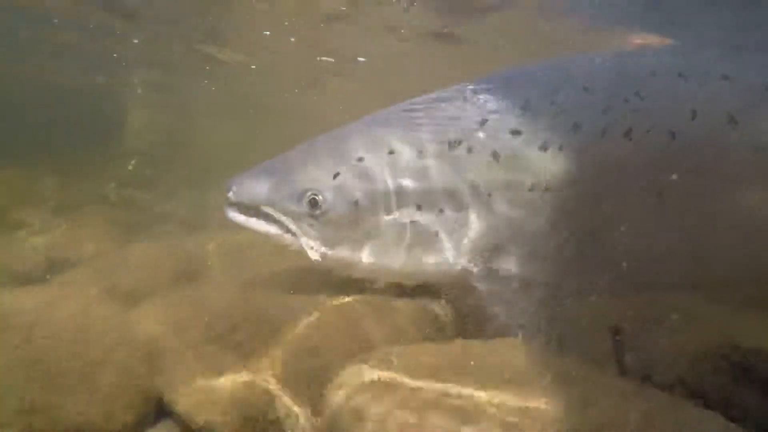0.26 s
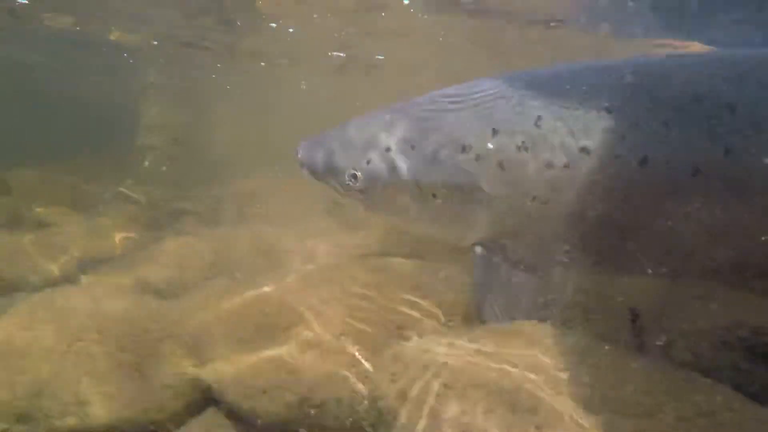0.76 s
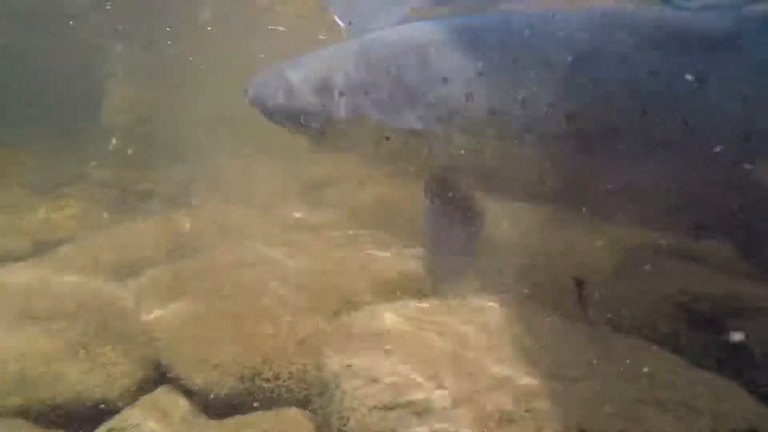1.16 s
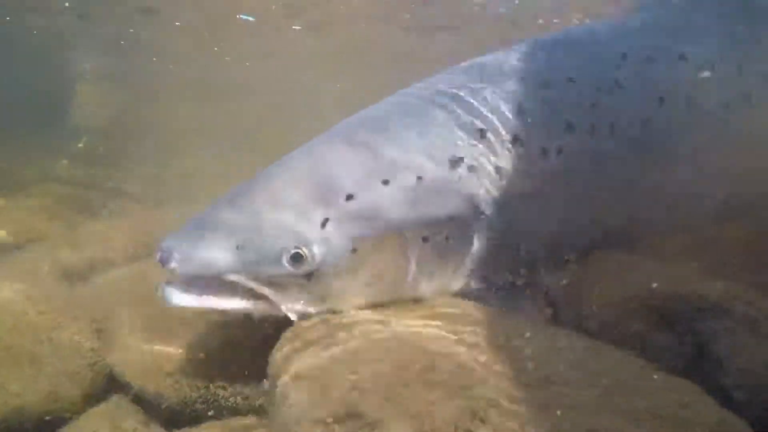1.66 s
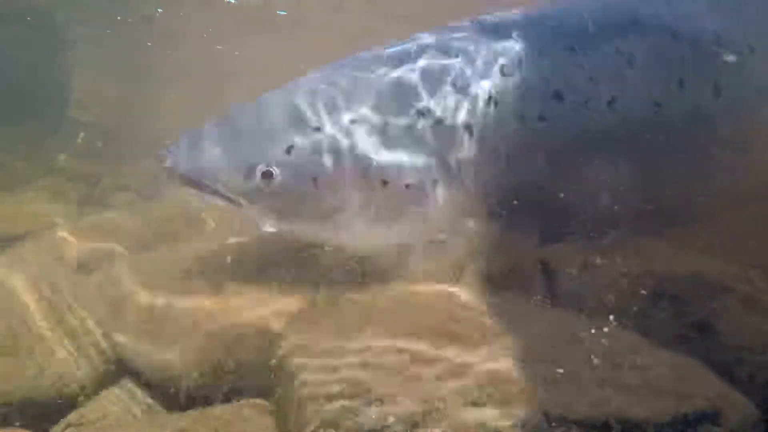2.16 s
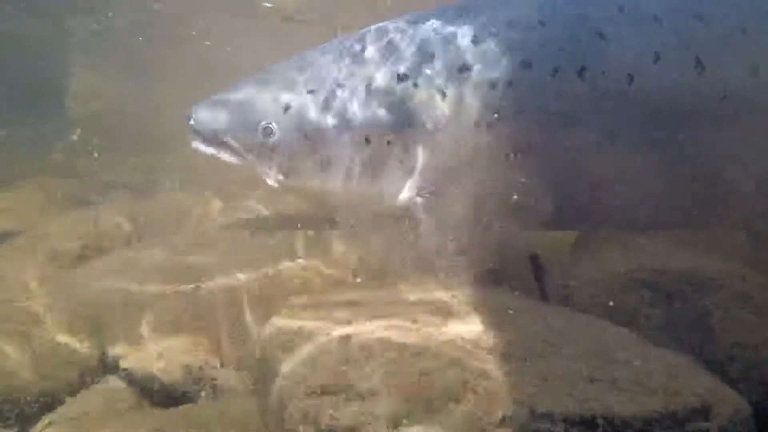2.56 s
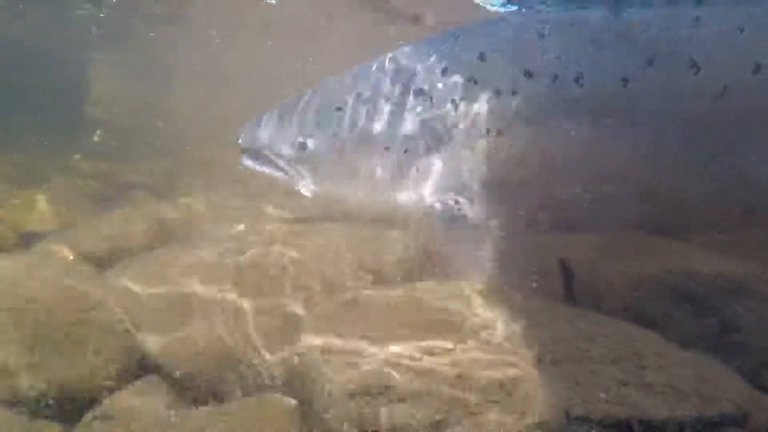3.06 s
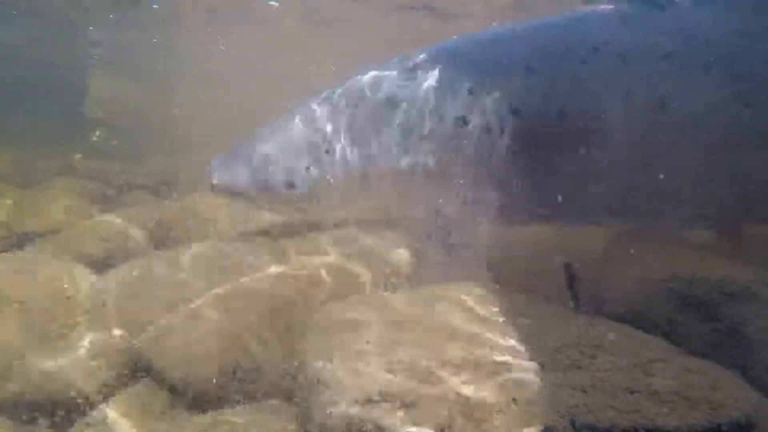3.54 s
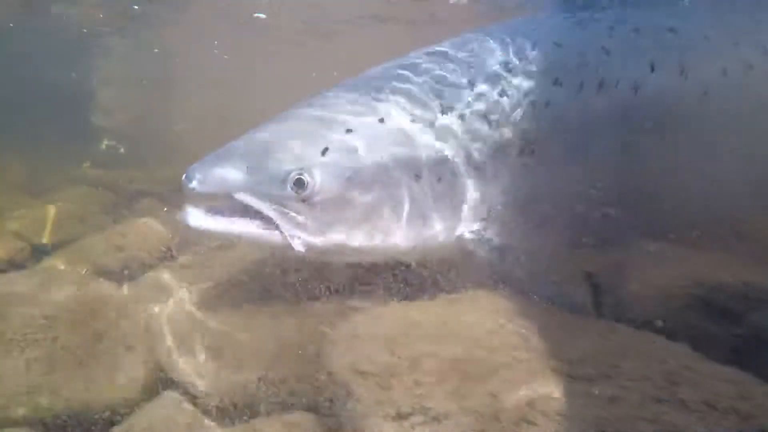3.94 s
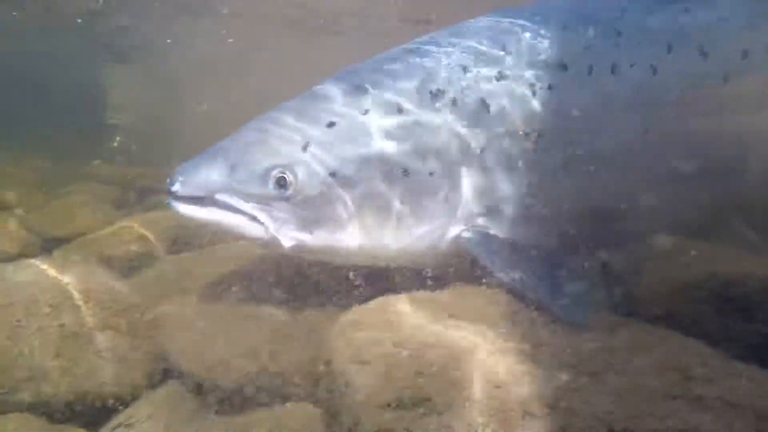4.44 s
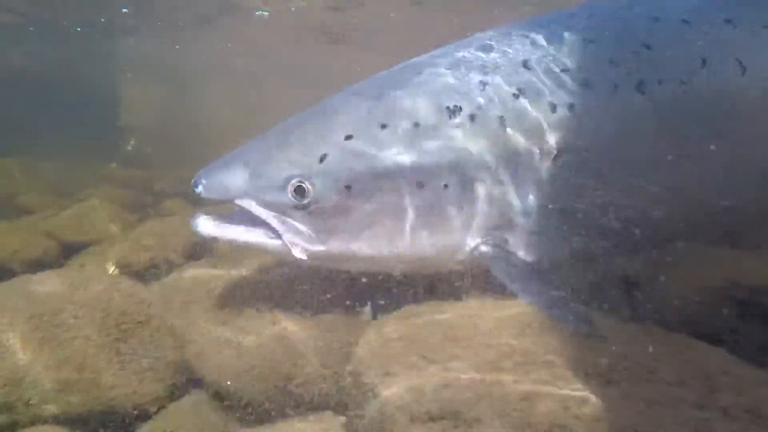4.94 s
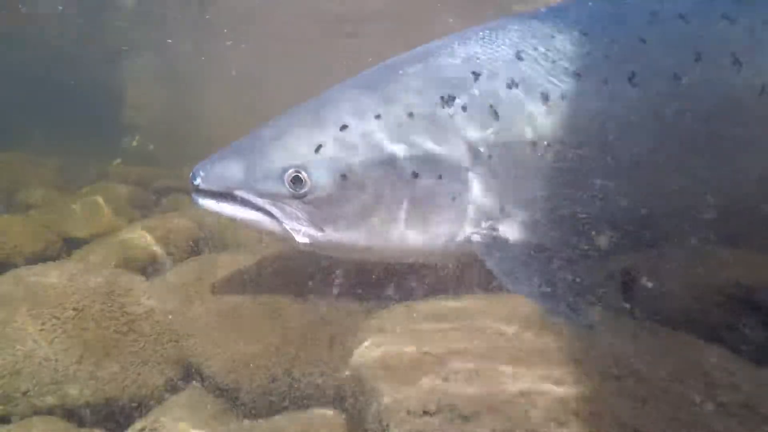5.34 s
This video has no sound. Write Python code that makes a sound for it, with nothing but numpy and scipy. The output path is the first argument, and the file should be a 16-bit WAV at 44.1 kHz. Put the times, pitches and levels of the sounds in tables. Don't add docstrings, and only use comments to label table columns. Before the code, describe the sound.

Close, muffled underwater sound: a lumpy low rush of current, boxy ringing bumps on a plastic-like shell, and small bubbles with fine grit. Around two seconds the mount hums briefly; at three it rattles and drags on stone, then slips with a clipping crack. Near-quiet follows, then wobbling air gurgles, soft thuds and rumble gradually swell back. The large fish itself makes no distinct sound.

```python
import sys
import numpy as np
from scipy import signal
from scipy.fft import rfft, irfft, next_fast_len
from scipy.io import wavfile

SR = 44100
rng = np.random.default_rng(int(sys.argv[2]) if len(sys.argv) > 2 else 0)


def transcribe(u):
    v = np.clip(np.atleast_2d(u).T, -1, 1)
    q = np.round(v * 32767).astype(np.int16)
    wavfile.write(sys.argv[1], SR, q)


def how_loud(loudness_db):
    steps = np.asarray(loudness_db, float) / 20
    return 10 ** steps


N = 246959

# pitch_hz, level_db (per Hz)
BUFFET_SPECTRUM = [(7.1, -35.5), (12, -6), (32, 1.5), (70, -4.5), (91, -37.5), (150, -120)]
# pitch_hz, level_db (per Hz)
CHURN_SPECTRUM = [(32, -21.5), (55, 3), (116, -6.5), (199, -22), (260, -19.5), (340, -46.5), (570, -120)]
# pitch_hz, level_db (per Hz)
RUSH_SPECTRUM = [(180, -34), (300, -1.5), (411, -9), (756, -11), (922, -8.5), (1240, -12.5), (1700, -26),
                 (2690, -37.5), (4800, -43), (9600, -42.5), (12300, -51), (13600, -64), (14300, -90.5),
                 (15500, -88)]
# pitch_hz, width_hz, level_db
HOUSING_MODES = [(294, 36.5, 4.5), (381.9, 36, -2.5)]
# pitch_hz, likeness (0-1), left_lead_rad, left_minus_right_db
PORT_DIFFERENCES = [(30, .85, 0, -2), (160, .68, 0, -.5), (280, .75, .3, -2.5), (450, .5, 1.2, 1),
                    (780, .6, 3.0, -2.5), (1200, .62, 2.4, -2), (2400, .55, 2.1, -.5), (4000, .2, .5, -1),
                    (6000, .03, 0, -1.5), (15000, 0, 0, -1.5)]
# start_s, fall_s (for 10 dB), buffet_db, churn_db
EDDY_EVENTS = [(0.0, 0.06, -46, -20), (0.05, 0.15, -23.5, -36), (0.28, 0.1, -27.5, -27),
               (0.53, .17, -14, -23.5), (0.77, .2, -22, -19.5), (1.2, 0.12, -23, -21),
               (1.4, .04, -16.5, -26), (1.5, 0, -26, -27), (1.62, .12, -18, -40), (1.66, .04, -21, -21),
               (1.74, 0.06, -31.5, -21), (1.87, 0.3, -23, -32.5), (2.05, 0.17, -31, -25.5),
               (2.2, 0.15, -22, -36), (2.35, 0.1, -35.5, -29), (2.49, 0.08, -17.5, -24),
               (2.63, 0.16, -24.5, -36), (2.79, .07, -27.5, -20.5), (3.0, .15, -25.5, -24),
               (3.21, 0.09, -29, -23), (3.3, .2, -25.5, -26), (3.66, 0.2, -36.5, -41),
               (3.99, .09, -58, -32), (4.14, 0.03, -55, -27), (4.37, 0.05, -33, -29),
               (4.88, .22, -31, -24.5), (5.12, 0.08, -24.5, -34), (5.23, .04, -26, -22),
               (5.35, .1, -28, -32), (5.54, 0.09, -32, -21)]
# start_s, fall_s (for 10 dB), level_db
RING_SWELLS = [(0.0, 0.02, -31.5), (0.52, 0.13, -26.5), (0.98, 0.05, -30.5), (1.3, 0.12, -26.5),
               (2.05, 0.04, -27), (2.42, .2, -34), (2.75, 0.06, -33), (3.17, 0.13, -29), (3.66, .05, -45.5),
               (4.02, 0.13, -40), (4.5, .3, -38), (4.82, 0.14, -30.5), (5.19, 0.03, -34),
               (5.56, 0.16, -24.5)]
# start_s, peak_db, pitch_hz, t60_s
BUBBLE_PINGS = [(1.1415, -37.5, 1820, 0.085), (1.198, -27.5, 1970, 0.032), (1.218, -35, 1390, 0.031),
                (1.229, -37, 1620, 0.028), (1.255, -41, 2570, 0.018), (1.262, -34, 1025, 0.086),
                (1.291, -24, 1585, 0.032), (1.3525, -28.5, 1180, 0.062), (1.387, -51, 2290, .04),
                (1.4436, -27, 1414, 0.029), (1.149, -37.5, 6060, 0.0087), (1.208, -30, 6960, 0.0053),
                (1.297, -26, 975, 0.025), (1.172, -39, 1080, 0.027), (1.304, -32, 1230, 0.027),
                (1.325, -33, 1500, 0.016), (1.257, -38, 7000, 0.0071), (1.197, -34, 6900, .008),
                (1.419, -30, 8450, 0.0077), (1.444, -49, 11800, 0.0093), (1.478, -46, 8850, .01),
                (3.648, -58, 2000, 0.034), (3.7788, -56, 7800, 0.015), (3.8904, -44, 1710, 0.053),
                (5.488, -42, 1850, 0.037)]
# start_s, level_db, final_pitch_hz, t60_s
GURGLE_EVENTS = [(3.925, -21, 95, .11), (3.977, -22, 88, .11), (4.017, -22, 80, .15), (4.128, -19, 80, .2),
                 (4.18, -26, 80, .12), (4.264, -29, 95, .1), (4.749, -23, 70, .12), (4.826, -24, 70, .12),
                 (5.004, -26, 80, .15), (5.10, -21, 55, .15), (5.258, -19, 70, .1)]
# peak_s, fall_s (for 10 dB), peak_rate_per_s, grain_db
GRIT_CLOUDS = [
    (1.22, .2, 420, -37.5),
    (1.6, 0.1, 200, -32.5),
    (3.08, 0.1, 400, -36),
    (3.35, 0.02, 1200, -27),
]
# start_s, dull_db, bright_db
GRIT_TICKS = [(1.1914, -47, -52), (1.1982, -42, -46), (1.2174, -52, -53), (1.2217, -47, -52),
              (1.255, -39, -52), (1.3544, -54, -58), (1.4012, -44, -54), (1.6017, -35, -54),
              (1.6176, -35, -51), (1.6545, -41, -58), (1.8047, -39, -59), (2.1445, -38, -63),
              (2.163, -40.5, -56), (2.199, -46, -45), (2.2506, -23.5, -49), (2.2657, -40, -60),
              (3.028, -41, -51.5), (3.0522, -47, -39), (3.0581, -39, -49), (3.071, -38, -45),
              (3.0849, -39, -51), (3.1256, -41, -55), (3.135, -39, -50), (3.1462, -33, -37.5),
              (3.1974, -54, -57), (3.222, -39, -59), (3.275, -41, -53), (3.287, -42.5, -57),
              (3.7733, -54, -73)]
# start_s, level_db, centre_hz
SPRAY_EVENTS = [(1.150, -46, 6400), (1.1515, -50, 5400), (1.191, -43, 8300), (1.194, -50, 4400),
                (1.2005, -47, 3700), (1.2175, -50, 7000), (1.2225, -41, 4800), (1.2235, -49, 7900),
                (1.2575, -44, 4700), (1.257, -49, 5900), (1.257, -49, 7900), (1.266, -50, 3400),
                (1.299, -53, 6000), (2.199, -47, 5200), (2.2506, -46, 3600), (3.033, -49, 3000),
                (3.064, -48, 4500), (3.085, -44, 2700), (3.289, -48, 4500)]
# loudest_s, fall_s (for 10 dB), second_harmonic_hz, level_db
HUM_EVENTS = [
    (1.925, .09, 201, -22.5),
    (4.89, .035, 191, -27),
]
# harmonic_number, level_db
HUM_HARMONICS = [(2, -5.5), (3, 2), (4, -31)]
# start_s, ring_db, shell_db, pan_db
KNOCK_EVENTS = [(0.263, -26, -56, 4), (0.452, -25, -34.5, 0), (0.648, -23, -53, 6), (0.707, -22, -52, 1),
                (0.752, -16.5, -40, -4.5), (0.871, -21.5, -29, -2), (0.964, -22.5, -23.5, -5),
                (1.069, -20, -51, 9), (1.373, -9.5, -31, -5), (1.856, -19.5, -21, -3),
                (2.052, -21.5, -31.5, -6.5), (2.481, -20, -22.5, -5), (2.708, -25.5, -35.5, -9),
                (2.78, -17.5, -34.5, 7), (2.979, -22, -40, -6), (3.051, -22, -48, -7),
                (3.099, -14.5, -19.5, -4.5), (3.167, -16.5, -37, -6), (3.181, -13.5, -42, 2),
                (3.205, -19, -46, -9), (3.288, -23.5, -39, -5.5), (3.751, -31, -36, 2),
                (4.129, -22, -52, -3), (4.553, -23, -28, 4), (4.821, -18.5, -44, 5), (5.188, -27, -53, 7),
                (5.322, -16.5, -22.5, 2.5), (5.509, -9, -28, 3)]
# start_s, thud_db, slap_db, pan_db
SHOVE_EVENTS = [(0.263, -21, -48, 4), (0.648, -18.5, -33.5, 5.5), (0.707, -22.5, -54, 3),
                (0.752, -16.5, -26.5, -5.5), (0.871, -26.5, -37, -2), (0.918, -15.5, -51, 6),
                (1.069, -15, -40, 6), (1.3715, -30, -35, -7), (1.651, -16.5, -48, -1),
                (2.052, -21.5, -58, -6), (2.481, -20.5, -43, -5.5), (2.708, -18.5, -35.5, -5),
                (2.78, -11, -34, 6), (2.979, -13.5, -40, -5), (3.051, -35, -24.5, -6.5),
                (3.099, -29, -28, -4), (3.167, -28, -36, -6), (3.181, -13.5, -43, 1),
                (3.205, -20, -25.5, -5.5), (3.288, -12.5, -28, -5.5), (3.931, -36, -44, -3),
                (4.334, -11.5, -44, 6), (4.553, -23.5, -38, 4.5), (4.743, -24.5, -45, 7),
                (5.11, -31, -31.5, 6.5), (5.188, -24, -58, 6), (5.322, -33, -27.5, 2.5),
                (5.509, -31, -38, 7)]
# start_s, level_db, pitch_hz, t60_s
RAP_EVENTS = [(3.030, -28, 560, .02), (3.035, -25, 520, .02), (3.0525, -20, 750, .015),
              (3.064, -25, 820, .018), (3.072, -27, 800, .015), (3.085, -25, 850, .015),
              (3.113, -27, 900, .012), (3.1455, -22, 1010, .012), (3.165, -26, 900, .012),
              (3.178, -21, 950, .015), (3.206, -23, 800, .012), (3.222, -28, 1300, .012),
              (3.276, -28, 860, .012), (3.2905, -25, 745, .02), (3.32, -24, 600, .015),
              (3.343, -19, 1100, .012), (3.349, -27, 1400, .012), (1.264, -32, 1100, .02),
              (.752, -24, 650, .015), (.648, -27, 600, .015), (1.069, -27, 500, .015),
              (5.108, -30, 900, .03), (2.2506, -28, 1750, .012)]
# peak_s, level_db, rise_s (for 10 dB), fall_s (for 10 dB)
SCRAPE_EVENTS = [
    (3.045, -28, .012, 0.08),
    (3.29, -31, 0.04, 0.5),
    (3.352, -23.5, 0, 0.6),
]
# pitch_hz, level_db, t60_s
MOUNT_MODES = [(602, -9, 0.035), (790, -1, 0.023), (883, -6, 0.035), (1500, -7.5, 0.0094)]
# start_s, level_db, brightness_hz
SLIP_EVENTS = [
    (3.3222, -18, 1500),
    (3.3339, -14.5, 1500),
    (3.3448, -6, 2000),
    (3.35541, 4, 5200),
]

CRACK_S = SLIP_EVENTS[-1][0]
RUMBLE_ESCAPES = .96


def rms_one(x):
    return x / np.sqrt(np.mean(x ** 2) + 1e-20)


def filtered(x, order, hz, kind="low"):
    return signal.sosfilt(signal.butter(order, hz, kind, fs=SR, output="sos"), x)


def at_hz(points, hz, column=1):
    table = np.array(points)
    return np.interp(np.log(hz), np.log(table[:, 0]), table[:, column])


def drift(rate_hz):
    r = np.exp(-80 * np.pi * rate_hz / SR)
    slow = signal.lfilter([1], [1, -2 * r, r * r], rng.standard_normal(N // 40 + 2002))[2000:]
    return np.interp(np.arange(N) / 40, np.arange(len(slow)), rms_one(slow))


def clicks_at(start_s, sizes):
    out = np.zeros(N)
    np.add.at(out, np.round(np.asarray(start_s) * SR).astype(int), sizes)
    return out


def ring(clicks, hz, t60):
    r = how_loud(-60 / (max(t60, 1e-3) * SR))
    w = 2 * np.pi * hz / SR
    return signal.lfilter([0, np.sin(w)], [1, -2 * r * np.cos(w), r * r], clicks + 1e-18)


def two_ports(x, left, right, lag=3):
    return np.array([left * x, right * np.roll(x, lag)])


def ports(x, other):
    size = next_fast_len(N + 4096)
    hz = np.arange(size // 2 + 1) * SR / size + 1
    alike = np.clip(at_hz(PORT_DIFFERENCES, hz), 0, 1)
    turn = np.exp(-1j * at_hz(PORT_DIFFERENCES, hz, column=2))
    lean = how_loud(at_hz(PORT_DIFFERENCES, hz, column=3) / 2)
    left = rfft(x, size)
    right = alike * turn * left + np.sqrt(1 - alike ** 2) * rfft(other, size)
    return irfft([left * lean, right / lean], size)[:, :N]


def banded(white, spectrum, patchy_db, lumps_per_s, size=1):
    together = drift(lumps_per_s)[::size]
    white = signal.resample_poly(white, 1, size, axis=-1)
    lowest, highest = spectrum[0][0], spectrum[-1][0]
    edges = np.geomspace(lowest, highest, 2 + int(3 * np.log2(highest / lowest)))
    out = 0
    for k, (low, high) in enumerate(zip(edges, edges[1:])):
        sos = signal.butter(2, [low, high], "band", fs=SR / size, output="sos")
        band = signal.sosfilt(sos, white[k % 2])
        flicker_db = patchy_db * (together + 0.55 * drift(28)[::size])
        out = out + band * how_loud(at_hz(spectrum, np.sqrt(low * high)) + flicker_db)
    return rms_one(signal.resample_poly(out, size, 1, axis=-1)[:, :N])


def peaks_db(peak_s, fall_s, db, rise_s=None):
    late = np.arange(0, N + 64, 64)[:, None] / SR - peak_s
    slope = np.where(late > 0, late / fall_s, -late / (fall_s if rise_s is None else rise_s))
    coarse = 10 * np.log10(np.sum(how_loud(2 * (db - 10 * slope)), axis=1) + 1e-20)
    return np.interp(np.arange(N) / 64, np.arange(len(coarse)), coarse)


def dives_db():
    since = np.arange(N) / SR - CRACK_S
    shut = np.clip((since - .001) / .006, 0, 1)
    since = np.maximum(since, 0)
    quick = 54.5 * np.exp(-since / 0.094)
    ease_db = 2
    slow = ease_db * np.logaddexp(0, (19.5 - 11.5 * since) / ease_db)
    return shut * quick, shut * slow


def gain_db():
    rest_db, start_low_db, hold_s, settle_s = 3.0, 6.5, 0.26, 0.28
    settling = start_low_db * np.exp(-np.maximum(np.arange(N) / SR - hold_s, 0) / settle_s)
    return rest_db - settling - sum(dives_db())


def swelling(calm_db, start_s, fall_s, db, gain):
    quick, slow = dives_db()
    early = start_s < CRACK_S
    before = peaks_db(start_s[early], fall_s[early], db[early]) - (1 - RUMBLE_ESCAPES) * quick - slow
    after = peaks_db(start_s[~early], fall_s[~early], db[~early])
    heard = np.hypot(how_loud(before), how_loud(after))
    return np.hypot(how_loud(calm_db + RUMBLE_ESCAPES * quick), heard / gain)


def current(gain):
    white = np.array([ports(*pair) for pair in rng.standard_normal((2, 2, N))])
    start_s, fall_s, buffet_db, churn_db = np.transpose(EDDY_EVENTS)
    housing = 0
    for hz, width, db in HOUSING_MODES:
        housing = housing + how_loud(db) * rms_one(ring(ring(white[0], hz, 2.53 / width), hz, 2.6 / width))
    buffet = banded(white, BUFFET_SPECTRUM, patchy_db=-0.5, lumps_per_s=17, size=16)
    churn = banded(white, CHURN_SPECTRUM, patchy_db=3.0, lumps_per_s=10.4, size=16)
    rush = banded(white, RUSH_SPECTRUM, patchy_db=.5, lumps_per_s=15)
    out = swelling(-35, start_s, fall_s, buffet_db, gain) * how_loud(3.5) * buffet
    out += swelling(-39, start_s, fall_s, churn_db, gain) * how_loud(3.5) * churn
    ring_level = swelling(-47, *np.transpose(RING_SWELLS), gain)
    out += ring_level * how_loud(-2.0 + 1.7 * drift(36)) * rms_one(housing)
    return out + how_loud(-36) * rush


def grit_clouds():
    peak_s, fall_s, per_s, grain_db = np.transpose(GRIT_CLOUDS)
    passing = np.arange(N) / SR < CRACK_S + .002
    stray_per_s, stray_db = 75, -42
    per_s = stray_per_s + passing * how_loud(peaks_db(peak_s, fall_s, 20 * np.log10(per_s)))
    grain_db = np.maximum(stray_db, np.where(passing, peaks_db(peak_s, fall_s, grain_db), -99))
    force_db = 4.4 * np.minimum(rng.exponential(1, N), 4)
    grains = (rng.random(N) < per_s / SR) * how_loud(grain_db + force_db)
    dealt = rng.integers(0, 8, N)
    out = 0
    for k, hz in enumerate(np.geomspace(550, 3500, 8)):
        out = out + ring(grains * (dealt == k), hz, 6.2 / hz) * (600 / hz) ** 0.58
    out = filtered(out, 4, 4000)
    return ports(out, out[::-1])


def bubbles():
    out, t = np.zeros(N), np.arange(SR // 8) / SR
    for s, db, hz, t60 in BUBBLE_PINGS:
        decay = how_loud(db + 9.5 - 60 * t / t60) * (1 - np.exp(-t / 0.0012))
        ping = np.sin(2 * np.pi * hz * (t - 0.48 * t ** 2)) * decay
        part = out[round(s * SR):round(s * SR) + len(t)]
        part += ping[:len(part)]
    return two_ports(out, 1.1, 0.5)


def gurgles():
    out, t = np.zeros(N), np.arange(SR // 4) / SR
    sag, sag_s, rise_s = .4, .015, .006
    for s, db, hz, t60 in GURGLE_EVENTS:
        turns = hz * (t + sag * sag_s * (1 - np.exp(-t / sag_s)))
        decay = how_loud(db + 6 - 60 * t / t60) * (1 - np.exp(-t / rise_s))
        out[round(s * SR):round(s * SR) + len(t)] += np.sin(2 * np.pi * turns) * decay
    return out


def ticks():
    start_s, dull_db, bright_db = np.transpose(GRIT_TICKS)
    dull = ring(ring(clicks_at(start_s, how_loud(dull_db - 3.5)), 1900, .004), 2100, .002)
    spray_s = .0012
    hits = clicks_at(start_s, how_loud(bright_db - 3.0)) + 1e-18
    spray = signal.lfilter([1], [1, -np.exp(-1 / (spray_s * SR))], hits)
    bright = ring(ring(spray * rng.standard_normal(N), 4700, .0015), 3400, .001)
    return two_ports(dull, 1.1, 0.5) + two_ports(bright, 1.04, 0.5)


def sprays():
    luck = rng.random((len(SPRAY_EVENTS), 2, 4))
    out = 0
    for (s, db, hz), (late, size) in zip(SPRAY_EVENTS, luck):
        grains = clicks_at(s + .002 * late, how_loud(db + 10) * (.3 + .7 * size))
        out = out + ring(grains, hz, 14.0 / hz)
    return two_ports(filtered(out, 2, 2200, "high"), 1.1, 0.6)


def hum():
    loudest_s, fall_s, hz, db = np.transpose(HUM_EVENTS)
    t = np.arange(N) / SR
    nearest = np.argmin(np.abs(t[:, None] - loudest_s), axis=1)
    late = t - loudest_s[nearest]
    db = db[nearest] - 10 * (late / fall_s[nearest]) ** 2
    hz = hz[nearest] + 30 * np.clip(late, -.3, .3)
    phase = np.pi * np.cumsum(hz * (1 + 0.01227 * drift(12.8))) / SR
    tone = sum(how_loud(level) * np.sin(k * phase) for k, level in HUM_HARMONICS)
    return tone * how_loud(np.maximum(db, -200) + 0.72 * drift(25)) * [[1.5], [.6]]


def bumps():
    knock_s, ring_db, shell_db, pan_db = np.transpose(KNOCK_EVENTS)
    shove_s, thud_db, slap_db, lean_db = np.transpose(SHOVE_EVENTS)
    luck = rng.normal(0, 1, (2, len(knock_s)))
    chance = rng.normal(0, 1, (3, len(shove_s)))
    t = np.arange(SR // 10) / SR
    slap = np.sin(2 * np.pi * (260 * t + 5.14 * (1 - np.exp(-t / 0.00702)))) * how_loud(-60 * t / 0.03)
    thud = np.sin(2 * np.pi * (75 * t + 1.46 * (1 - np.exp(-t / 0.01)))) * how_loud(-60 * t / 0.067)
    thud = thud * (1 - np.exp(-t / 0.0018))
    out = 0
    for side in (1, -1):
        lean = how_loud(side * np.clip(pan_db - 1.5, -9, 9) / 2)
        push = how_loud(side * np.clip(lean_db, -9, 9) / 2)
        near = ring(clicks_at(knock_s + 0.0025 - side * .0001, -lean * how_loud(ring_db + 4.5)), 315.2, 0.052)
        near += ring(clicks_at(knock_s + .002, -lean * how_loud(ring_db - 5 + 3 * luck[0])), 375, .04)
        shell_s = knock_s + side * (.0001 + .00002 * luck[1])
        near += ring(clicks_at(shell_s, lean * how_loud(shell_db + 3.5)), 1374, 0.025)
        thuds = clicks_at(shove_s + 0.0013 + side * 0.00065 * chance[0],
                          push * np.sign(chance[1]) * how_loud(thud_db + 3.5))
        slaps = clicks_at(shove_s - side * (0.00028 + .00003 * chance[2]), push * how_loud(slap_db + 11))
        near += signal.fftconvolve(thuds, thud)[:N] + signal.fftconvolve(slaps, slap)[:N]
        out = out + np.outer([side > 0, side < 0], near)
    return filtered(out, 4, 1700)


def raps():
    rings = sum(ring(clicks_at([s], how_loud(db + 5)), hz, t60) for s, db, hz, t60 in RAP_EVENTS)
    softened = signal.lfilter([.3], [1, -.7], rings)
    return two_ports(softened, 0.85, 1.15, lag=12)


def scrape():
    force_db = 5 * np.minimum(rng.exponential(1, (2, N)), 4)
    catches = (rng.random((2, N)) < 400 / SR) * how_loud(force_db)
    rings = sum(how_loud(db) * ring(catches * rng.choice([-1, 1], N), hz, t60) for hz, db, t60 in MOUNT_MODES)
    peak_s, db, rise_s, fall_s = np.transpose(SCRAPE_EVENTS)
    level_db = peaks_db(peak_s, fall_s, db, np.maximum(rise_s, .002))
    ending = np.clip((peak_s[-1] + .009 - np.arange(N) / SR) / .006, 0, 1) ** 2
    return ports(*rms_one(rings)) * how_loud(level_db) * ending


def rasp():
    left_s = CRACK_S - np.arange(N) / SR
    hiss = rms_one(filtered(rng.standard_normal((2, N)), 4, [700, 4800], "band"))
    hiss = hiss * how_loud(-33.5 - 10 * np.abs(left_s) / .014)
    squeak = np.sin(2 * np.pi * 7950 * left_s) * how_loud(-52.5) * np.clip((.022 - left_s) / .004, 0, 1)
    return (hiss + squeak) * (left_s > 0)


def crack():
    t = np.arange(-SR // 500, SR // 100) / SR
    push = np.exp(-(t / .0004) ** 2)
    back = -np.cos(2 * np.pi * 470 * t) * np.exp(-np.abs(t) / .0009)
    snap = np.where(t < 0, push, back)
    out = np.zeros(N)
    for s, db, hz in SLIP_EVENTS:
        at = round((s + t[0]) * SR)
        out[at:at + len(t)] += how_loud(db) * filtered(snap, 2, hz)
    shudder = sum(ring(clicks_at([CRACK_S + .003], how_loud(-36)), hz, 0.08) for hz in (130, 205, 330))
    return two_ports(out, 1, -.8) + shudder


def scene():
    gain = how_loud(gain_db())
    river = current(gain) + grit_clouds()
    water = bubbles() + gurgles() + ticks() + sprays()
    mount = hum() + bumps() + raps() + scrape() + rasp() + crack()
    return river + (water + mount) / gain


def roll_off(x):
    return signal.sosfilt(signal.butter(12, 16480, fs=SR, output="sos"), x)


def record(dry):
    loud = np.clip(dry * how_loud(gain_db()), -.95, .95)
    loud = filtered(loud, 4, 14800)
    mix = loud * np.minimum(1, np.arange(N)[::-1] / (.005 * SR))
    return roll_off(mix)


dry = scene()
out = record(dry)
transcribe(out)
```